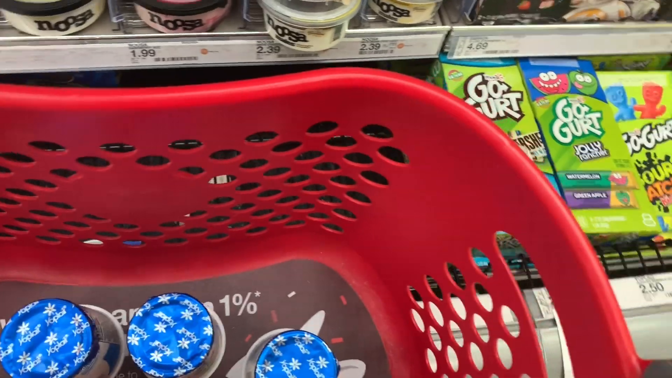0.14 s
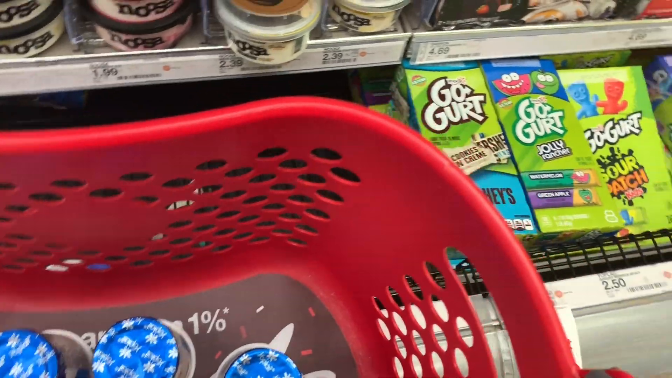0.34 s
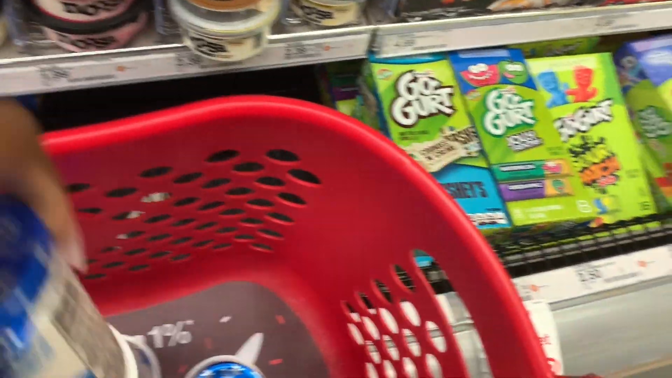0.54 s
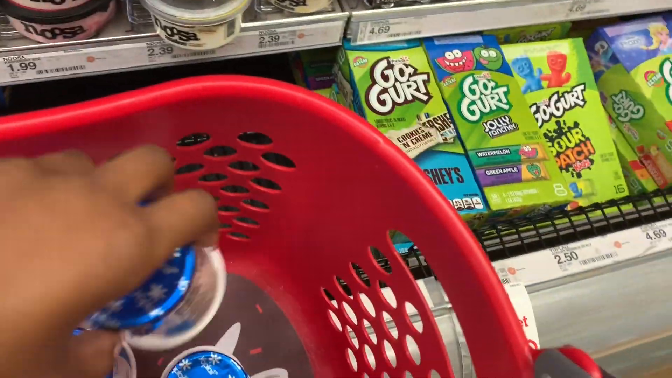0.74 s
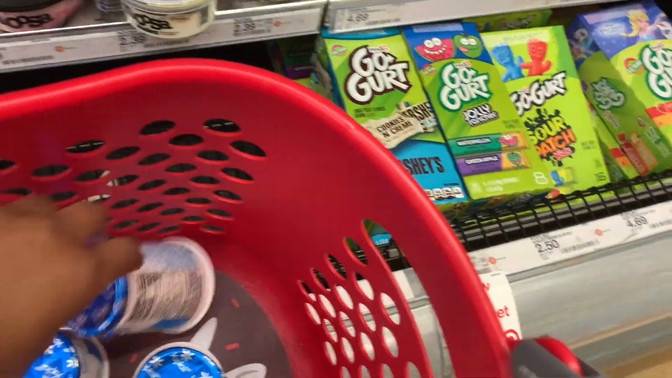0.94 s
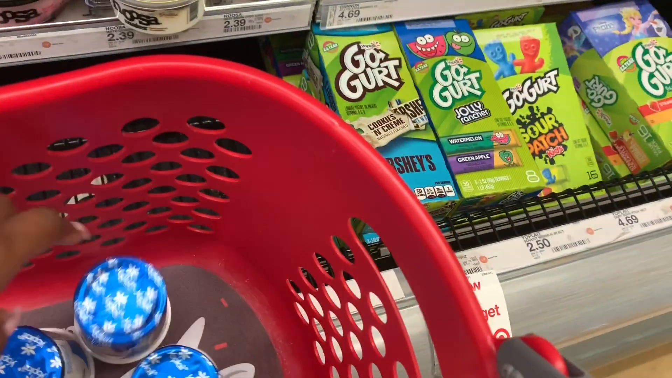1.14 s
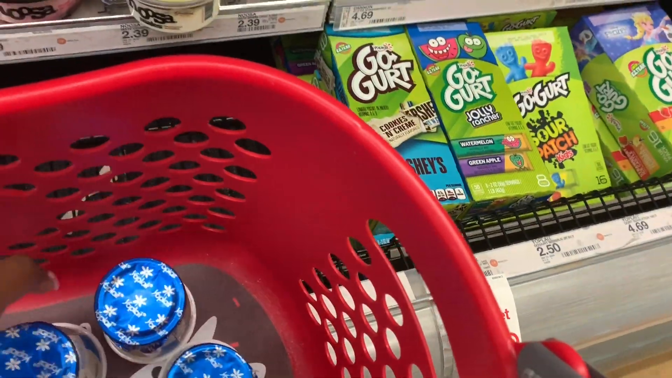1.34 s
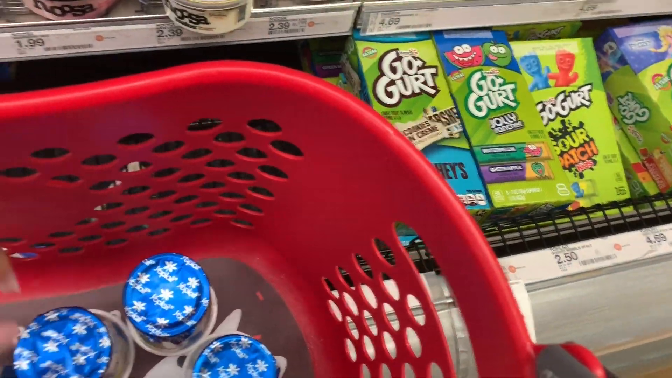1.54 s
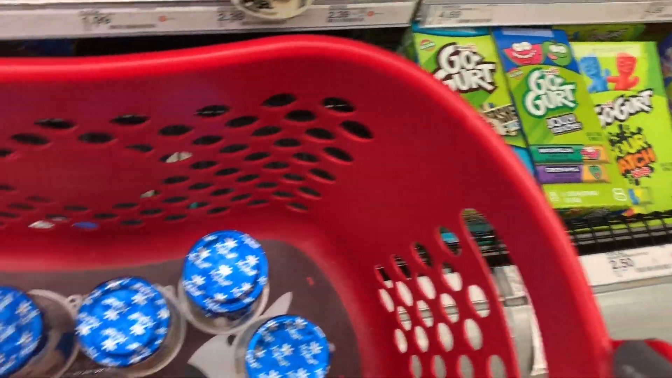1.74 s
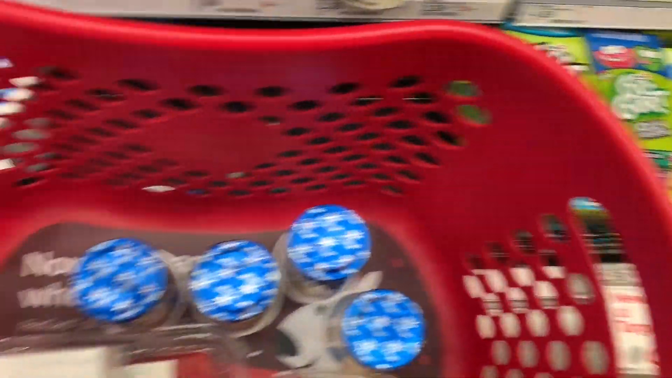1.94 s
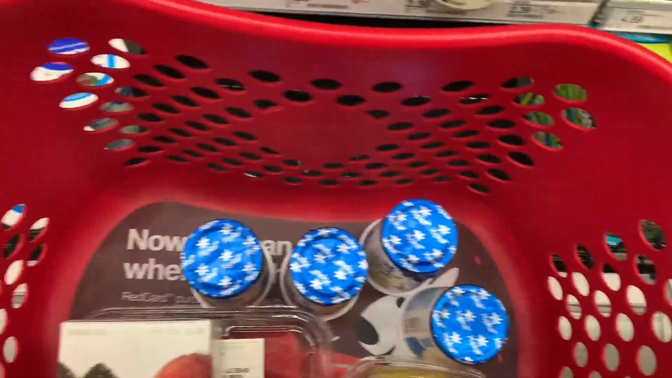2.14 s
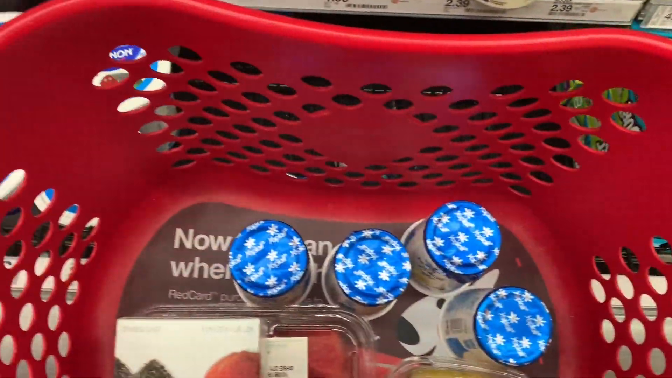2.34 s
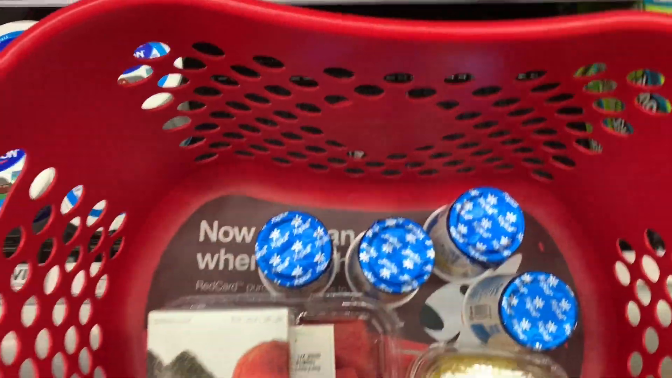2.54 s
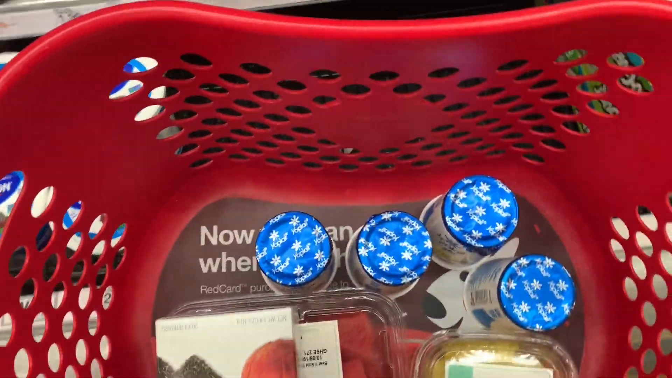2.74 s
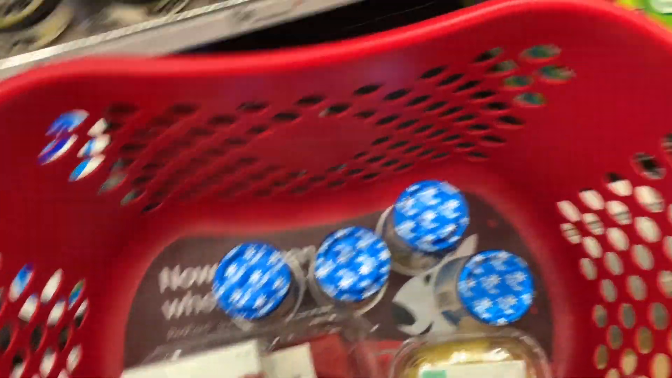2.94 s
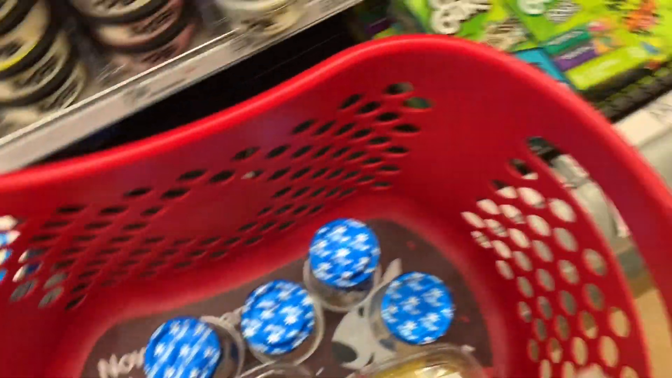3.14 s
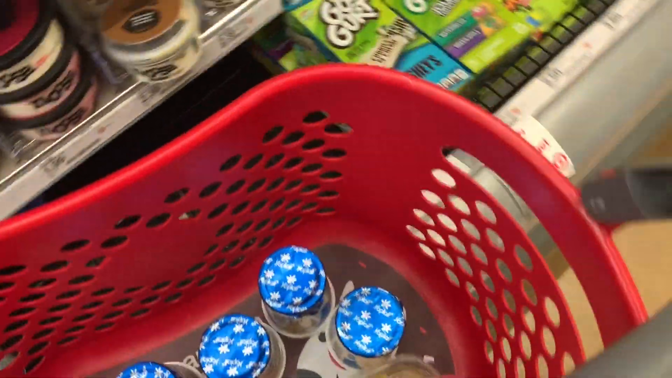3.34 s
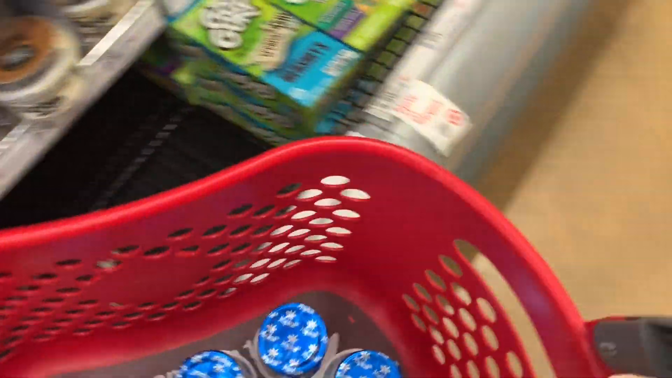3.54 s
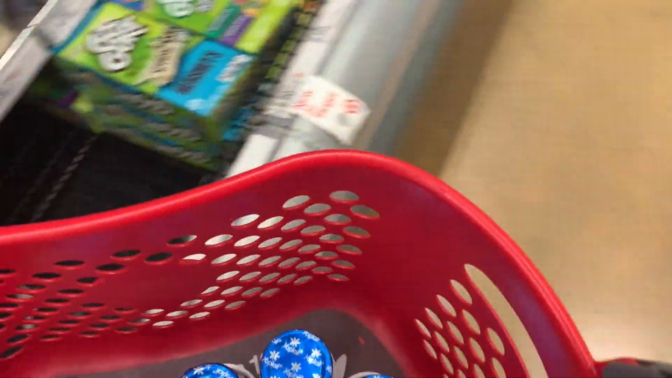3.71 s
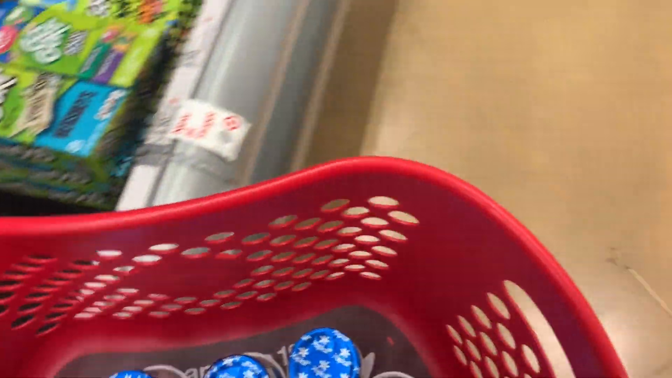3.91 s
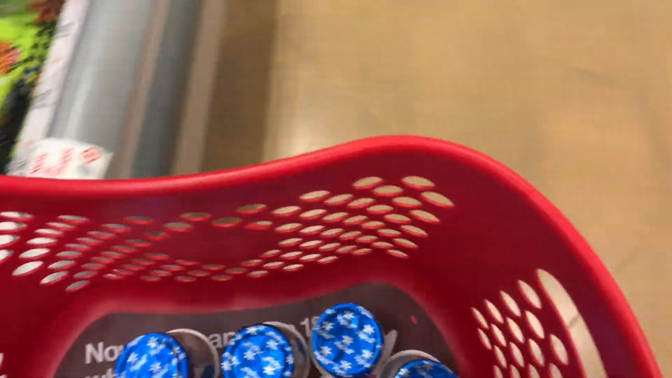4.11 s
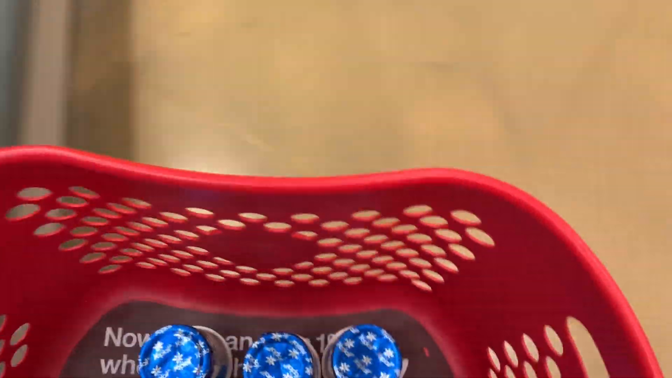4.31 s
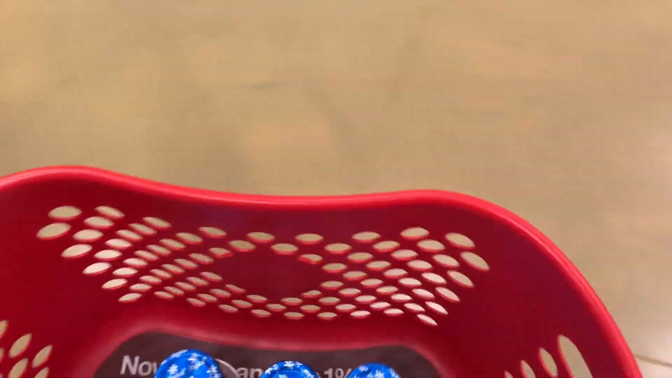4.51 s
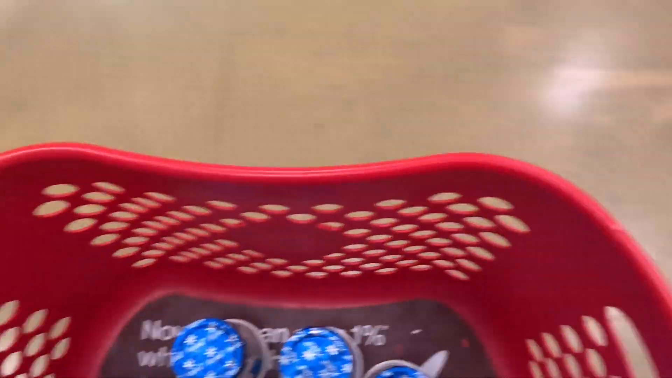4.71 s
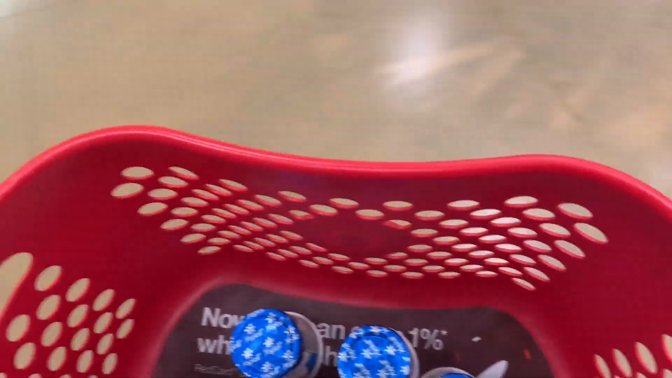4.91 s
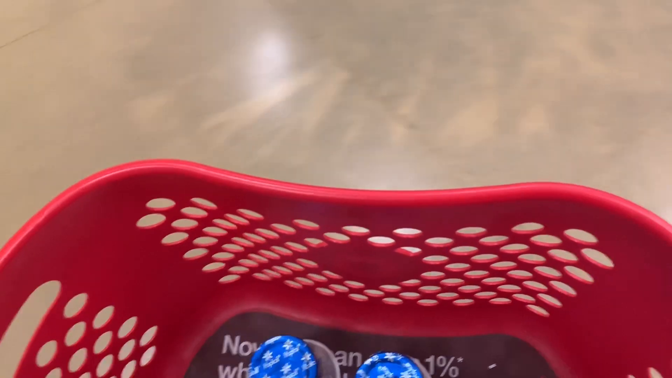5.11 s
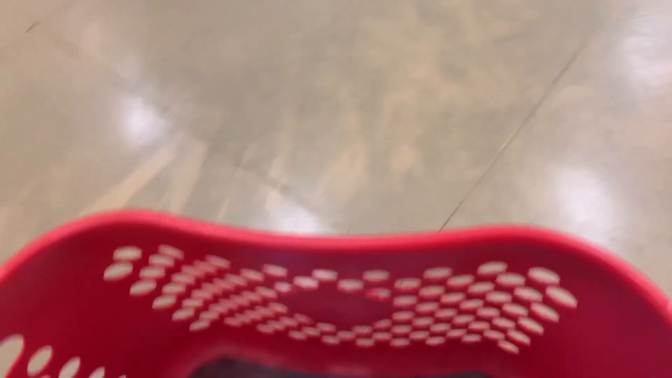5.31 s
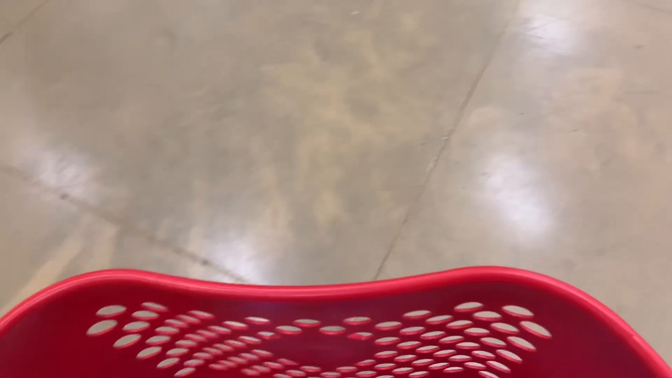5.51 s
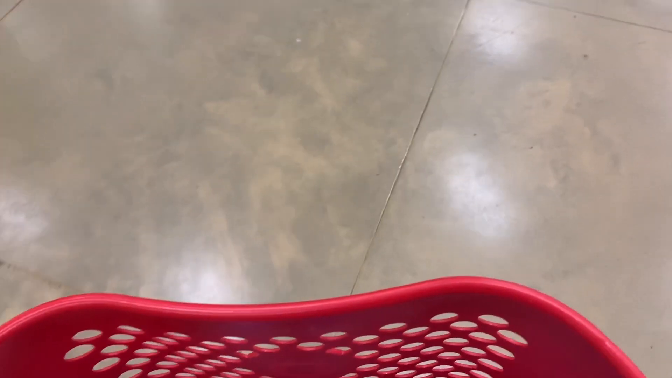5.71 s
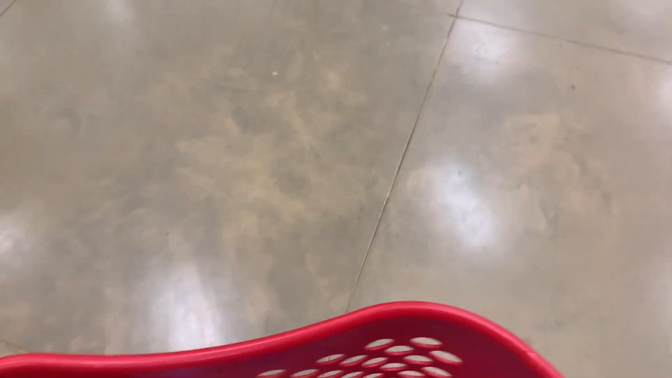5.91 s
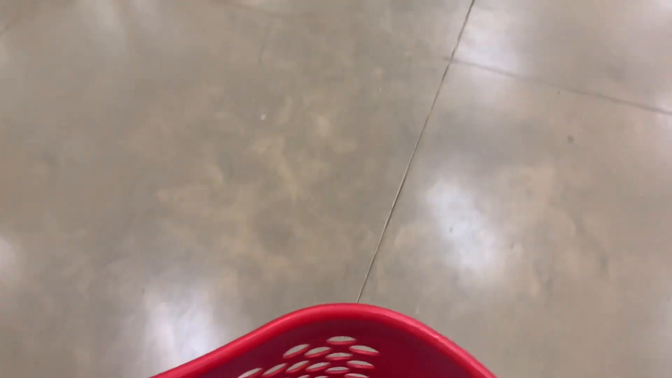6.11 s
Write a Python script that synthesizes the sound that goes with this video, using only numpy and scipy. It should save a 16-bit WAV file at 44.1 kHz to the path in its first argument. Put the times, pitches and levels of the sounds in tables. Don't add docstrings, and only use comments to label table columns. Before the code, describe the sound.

Beside open store refrigerators, a low unsteady hum and fan rumble runs throughout. Close to a hand-held phone, fingers rustle, foil ticks, and a plastic cup lands in a plastic basket with two hard clacks around one second. Later the cups jostle in a brief rattle as the basket swings. The hum weakens as the shopper walks away, and a tiny wheel squeak comes near the end.

```python
import sys
import numpy as np
from scipy import signal
from scipy.fft import rfft, irfft, next_fast_len
from scipy.io import wavfile
from scipy.ndimage import uniform_filter1d, map_coordinates

SR = 44100
rng = np.random.default_rng(int(sys.argv[2]) if len(sys.argv) > 2 else 0)


def how_loud(loudness_db):
    steps = np.asarray(loudness_db, float) / 20
    return 10 ** steps


def unload_wav(signal):
    wavfile.write(
        sys.argv[1],
        SR,
        np.round(np.clip(np.atleast_2d(signal).T, -1, 1) * 32767).astype(np.int16),
    )


N = 271646

# time [s], distance from the row [m].
WALK = [
    (0, 0.93),
    (1.1, 0.92),
    (3.6, 0.96),
    (4.3, 1.235),
    (4.8, 1.65),
    (5.25, 2.1),
    (5.7, 2.12),
    (6.16, 1.92),
]
# pitch [Hz], phase drift [rad].
HUM_TONES = [
    (59.2, 1.2),
    (139.6, 0.48),
    (279, 1.4),
]
# time [s], level [dB].
MAINS_LEVEL = [(0, -44), (.9, -46), (1.0, -36.5), (2.3, -37), (3.5, -30.5), (4.6, -36.5), (5.3, -39.5),
               (6.16, -40)]
# start [s], length [s], level [dB].
CRESTS = [(-.02, 0.2, -28.5), (.46, 0.35, -27.5), (.8, .64, -24.5), (1.56, 0.93, -26), (2.82, 0.91, -22.5),
          (3.95, 0.425, -28.5), (4.45, 0.376, -33), (4.85, 0.32, -36), (5.18, 0.41, -25.5),
          (5.58, 0.485, -28)]
# centre [Hz], width [Hz], level [dB].
DUCT = [(191.8, 14.7, -7), (209.7, 9.2, -9)]
# start [s], length [s], level over the steady throb [dB].
SURGES = [(.02, .36, 3.5), (.5, 0.072, 10.5), (.66, 0.38, 5.5), (1.28, 0.29, 5.5), (1.79, .13, 12),
          (2.0, 0.075, 2), (2.38, 0.13, 2.5), (3.2, 0.12, 8), (3.52, 0.14, -16), (4.2, 0.058, 3),
          (4.66, 0.15, 3), (5.2, 0.11, 7)]
# frequency [Hz], density [dB per Hz].
FAN_RUMBLE = [(70, -18), (130, -4.5), (170, 4.5), (230, 3), (300, -8.5), (400, -8.5), (470, -10.5),
              (550, -11.5), (660, -14), (800, -12), (1050, -25.5), (1600, -52)]
# frequency [Hz], density [dB per Hz].
HALL_DEEP = [(22, -39), (45, -3), (70, -3), (100, 1.5), (120, 5), (170, -12), (260, -48)]
# frequency [Hz], density [dB per Hz].
CABINET_BOOM = [(190, -14), (250, 1.5), (330, 2), (420, -12.5), (520, -45.5)]
# frequency [Hz], density [dB per Hz].
AIR_CURTAIN = [(700, -26), (1100, 2.5), (1400, 2), (2100, 0), (2600, -3), (2900, -11), (4200, -12),
               (4800, -22.5), (6000, -78)]
# frequency [Hz], density [dB per Hz].
FAR_HISS = [(3500, -16), (5000, -24), (7600, -17), (9500, 7), (10900, -5), (12500, -6), (14400, -1),
            (15400, -1), (16000, -12), (16300, -50), (17000, -70)]
# frequency [Hz], left-right likeness [-1 to 1].
ROOM_ALIKE = [(60, 0.92), (130, 0.95), (290, 0.89), (640, 0.32), (1410, -0.17), (3100, 0.11), (6820, -0.29),
              (9500, 0.92), (12000, 0.94)]
# frequency [Hz], left minus right [dB].
FRIDGE_TILT = [(60, -0.5), (110, -3.5), (200, 0), (380, -2), (700, 1), (1290, 0), (2380, -0.5), (4400, 1.5),
               (8120, -4.5), (15000, 2)]

# start [s], length [s], rise [share 0-1], level [dB].
BRUSHES = [(0, 0.018, 0.3, -52.5), (.214, 0.22, 0, -50), (0.346, 0.041, .9, -47), (0.377, .12, .5, -54),
           (0.562, 0.14, 0.38, -53), (0.702, 0.21, 0.03, -50), (0.849, 0.044, .6, -43),
           (0.887, 0.057, 0.5, -41), (0.9562, .008, 0.1, -33), (0.965, 0.028, 0.2, -30),
           (0.99, 0.096, 0.28, -41), (1.084, .018, 0.3, -40), (1.103, .027, 0, -36),
           (1.119, 0.012, 0.5, -35), (1.143, .036, 0.5, -34), (1.377, 0.12, 0.25, -56),
           (1.872, 0.096, 0.5, -59), (2.418, 0.1, 0.3, -49.5), (2.727, 0.19, 0.55, -61),
           (3.077, .08, .4, -61), (3.282, 0.21, 0.7, -57), (3.416, 0.037, 0.3, -41.5),
           (3.432, 0.13, 0.33, -48), (3.52, 0.089, 0.1, -45), (3.61, 0.014, .3, -46),
           (4.443, 0.4, 0.33, -56), (4.672, 0.26, .45, -64), (5.273, .06, .5, -60), (5.632, .19, 0.62, -54),
           (5.915, 0.092, 0.4, -63)]
# frequency [Hz], density [dB per Hz].
BRUSH_SPECTRUM = [(2500, -8), (5000, -4.5), (7500, 1), (10000, 3.5), (13500, 2.5), (16000, -5),
                  (17000, -59)]
# start [s], length [s], resonance [Hz], level [dB].
SCRAPES = [(.843, 0.042, 13100, -33), (.884, 0.045, 13400, -35), (.908, 0.022, 7500, -48),
           (.847, 0.058, 10000, -37.5), (.852, 0.043, 7460, -47), (.99, 0.058, 4000, -47),
           (1.1255, 0.006, 6100, -24), (1.124, .008, 13500, -33), (1.125, 0.06, 980, -35),
           (2.725, 0.19, 13500, -56), (3.526, 0.032, 1910, -47), (3.619, 0.012, 5640, -32),
           (3.621, 0.013, 3900, -31.5), (4.199, 0.0045, 6140, -34), (4.2045, 0.0045, 5900, -33),
           (4.209, 0.006, 12900, -33), (4.205, 0.042, 10800, -58), (5.69, 0.05, 2000, -58),
           (5.67, 0.14, 4900, -62.5)]
# start [s], length [s], resonance [Hz], level [dB].
SKIDS = [(.885, 0.049, 3700, -42), (.886, 0.052, 2500, -47), (.916, 0.013, 6400, -48),
         (3.427, .01, 13400, -39), (.9565, 0.058, 2380, -33.5), (.959, 0.056, 4200, -36),
         (1.083, .023, 13000, -29.5), (1.105, .027, 13100, -32), (1.124, 0.053, 2550, -36.5),
         (1.122, 0.088, 4200, -40.5), (1.19, 0.056, 2880, -51), (1.624, 0.061, 4570, -55),
         (3.418, 0.055, 2150, -37), (3.533, .012, 3950, -38), (3.626, .016, 4050, -38),
         (3.623, .008, 6300, -36), (3.62, 0.023, 2100, -38.5), (4.199, 0.014, 13100, -30.5),
         (4.215, 0.047, 13300, -45)]
# frequency [Hz], left-right likeness [0 to 1].
RUB_ALIKE = [(3000, 0.35), (6500, 0.5), (9000, 0.9), (13000, 0.95)]

# start [s], foil level [dB].
FAINT_TICKS = [(0.223, -43), (0.378, -27), (0.4014, -44), (0.7218, -52), (0.3145, -50), (0.4165, -48),
               (4.975, -47), (1.1934, -43), (1.2084, -39), (1.222, -34), (1.2584, -42), (2.4199, -43),
               (2.4488, -38), (3.28, -39), (3.3378, -40), (3.963, -44), (4.466, -39), (5.2789, -41),
               (5.294, -39), (5.2999, -37)]
# start [s], foil level [dB], wall ring [Hz],
# wall level [dB], brightness [dB per octave].
SET_DOWN = [(0.3411, -37, 7200, -28.5, -1), (0.3574, -32, 7310, -35, -1), (0.3688, -11, 7360, -28, -1.5),
            (0.9562, -19, 5700, -21, 0), (0.971, -14.5, 7090, -25, -2.5), (0.98, -23, 5830, -25, -11.5),
            (1.008, -32, 4000, -51, 3), (1.02, -29, 3500, -38, 0), (1.0144, -29, 3910, -31, -1),
            (1.034, -32, 3870, -43, -6.5), (1.051, -28, 7560, -47, 3), (1.1174, -3.5, 5000, -37, 0.7),
            (1.1245, -19, 3800, -26, 1), (1.128, -22, 6100, -23, 0), (1.142, -9, 5000, -26, 0),
            (1.152, -17.5, 2780, -21.5, -3), (1.16, -22, 2760, -30, -6), (1.168, -22.5, 3980, -30, -4),
            (1.178, -21, 6020, -44, -4), (1.1997, -20, 4200, -33.5, -1.5), (1.2503, -26.5, 4260, -38, -1)]
# start [s], foil level [dB], wall ring [Hz],
# wall level [dB], brightness [dB per octave].
JOSTLE = [(3.421, -34, 2890, -28, 6), (3.425, -23, 2800, -39, -7), (3.432, -17, 3450, -30, -5),
          (3.437, -29, 5000, -40, -6), (3.4864, -40, 2820, -41, 1), (3.5197, -33, 5500, -40, -2),
          (3.5293, -23, 2600, -29, -6.5), (3.5325, -19.5, 3540, -22, -4), (3.5357, -25, 5200, -26, -7),
          (3.546, -25, 4170, -45, -4), (3.5554, -31, 4090, -45, -3), (3.567, -27, 3560, -48, -4.5),
          (3.577, -21.5, 4270, -32, -3), (3.586, -40, 4200, -42, 0), (3.622, -19, 3570, -37, -3.5),
          (3.626, -26, 6000, -29, 1), (3.6307, -21, 4130, -29, -5), (3.658, -35, 4200, -42, 0),
          (3.667, -30.5, 3590, -43, -4.5), (4.2, -30, 6200, -48, 2), (4.511, -29, 4380, -40.5, 1),
          (4.611, -32.5, 4470, -42, -2), (5.184, -39, 5000, -46.5, -3)]
# start [s], cup peak [dB], cup ring [Hz],
# basket level [dB], hardness [0-1].
KNOCKS = [(0.955, -5, 1076, -7, 0.76), (0.964, -10.5, 607, -15, 0.4), (1.1239, -13.5, 1150, -17, 0.7),
          (1.128, -13.5, 605, -32, 0.9), (1.131, -24, 764, -16, 1), (1.138, -25, 756, -35, 0.5),
          (1.145, -28, 820, -39, 0.8), (1.1514, -10.5, 783, -18.5, 0.53), (1.157, -17, 1260, -18, 1),
          (1.165, -24, 760, -25, 1), (1.177, -29, 686, -21, 0.2), (1.2, -27.5, 850, -43, 1),
          (3.418, -6.5, 747, -28, 0.85), (3.428, -23, 890, -38, 0.6), (3.435, -16, 676, -32, 0.25),
          (3.46, -28, 910, -40, 0.4), (3.468, -17.5, 760, -36, 0.55), (3.476, -23, 790, -23, 0.9),
          (3.531, -24, 630, -41, 0.8), (3.625, -25.5, 620, -33, 1), (4.2, -24, 1870, -60, 0.9),
          (4.2055, -17.5, 1880, -60, 0.86), (5.707, -33, 1890, -60, 0.53)]
# centre [Hz], width [Hz], level [dB].
FOIL = [(6090, 990, -6.5), (8100, 710, 3), (10000, 1180, 7), (13400, 2500, 3), (15800, 1140, -3)]
# centre [Hz], width [Hz], level [dB].
BASKET = [(70.4, 19, 3.5), (376, 57, 3), (578, 66, -5), (1656, 21, -7), (2370, 270, -6)]

# time [s], pitch [Hz], level [dB].
SQUEAK = [
    (5.62, 493.5, -42),
    (5.632, 494, -50),
    (5.67, 561, -45),
    (5.778, 516, -41),
    (5.92, 497, -48),
]
# frequency [Hz], 60 dB decay [s].
AISLE_DECAY = [(300, 0.21), (2000, 0.2), (10000, 0.094)]
# frequency [Hz], gain [dB].
CASE_COLOUR = [(5000, 0.5), (8000, -2.5), (10000, -3), (12600, -9), (14400, -7), (15900, -14), (16200, -30),
               (16700, -50)]

HZ = np.fft.rfftfreq(4096, 1 / SR)
FANS_DB, CABINET_DB, CURTAIN_DB, OVERTONE_DB, DUCT_DB = -25.5, -31, -46, -36, -31
HALL_DB, FAR_HISS_DB = -32.5, -72
ROW_LOSS_DB, CABINET_LOSS_DB, CURTAIN_LOSS_DB, DUCT_LOSS_DB = 23, 35, 18.5, 11.5
SCRAPE_RISE, SKID_RISE = 0.4, 0.041
FAINT_WALL_HZ, FAINT_WALL_DB, FAINT_BRIGHT_DB = 3200, -12, -3.5
TICK_T60_S = 0.0075
LIGHT_T60_S, DEADEN = 0.036, 2.1
LEFT_LATE_S, LATE_FROM_HZ, LATE_FULL_HZ = 0.000298, 5000, 8000


def unit(x):
    return x / np.sqrt(np.mean(x ** 2) + 1e-20)


def peak(x):
    return x / np.abs(x).max()


def along(points, hz):
    f, v = np.transpose(points)
    return np.interp(np.log(hz + 1), np.log(f + 1), v)


def curves(rows, **ends):
    s, *cols = np.transpose(rows)
    return [np.interp(np.arange(N) / SR, s, c, **ends) for c in cols]


def wobble(rate):
    knots = rng.standard_normal(int(N * rate / SR) + 4)
    return map_coordinates(knots, [np.arange(N) * rate / SR])


def plateaus(rows, edge_s):
    t = np.arange(N) / SR
    total = np.zeros(N)
    for s, length, db in rows:
        inside = np.clip(np.minimum(t - s, s + length - t) / edge_s, 0, 1)
        total += how_loud(db) * np.sin(np.pi / 2 * inside) ** 2
    return total


def filtered(x, response):
    m = next_fast_len(N + 8192)
    return irfft(rfft(x, m) * response(np.fft.rfftfreq(m, 1 / SR)), m)[..., :N]


def modes(table, f):
    return sum((-1) ** k * how_loud(db) * 1j * f * w / (c * c - f * f + 1j * f * w)
               for k, (c, w, db) in enumerate(table))


def ports(length, alike):
    a, b = rng.standard_normal((2, length))
    return np.array([a, alike * a + np.sqrt(abs(1 - alike ** 2)) * b])


def add(out, s, burst, lag):
    for side, part, late in zip(out, burst, (0, lag)):
        side[round(s * SR) + late:][:len(part)] += part


def rush(spectrum, patchy_db, alike=ROOM_ALIKE):
    z = signal.stft(rng.standard_normal((2, N + 512)), nperseg=512)[2]
    field = uniform_filter1d(rng.standard_normal(z.shape[1:]), size=6, axis=0)
    field = uniform_filter1d(field, size=14, axis=1)
    pair = signal.istft(z * how_loud(patchy_db * unit(field)), nperseg=512)[1][:, :N]

    def spread(hz):
        turn = np.arccos(np.clip(along(alike, hz), -1, 1)) / 2
        return how_loud(along(spectrum, hz)) * np.array([np.cos(turn), np.sin(turn)])

    mid, side = filtered(pair, spread)
    return unit(np.array([mid + side, mid - side]))


def fridges():
    decades = np.log10(curves(WALK)[0])
    air = how_loud(FANS_DB - ROW_LOSS_DB * decades + 1.85 * wobble(9)) * rush(FAN_RUMBLE, patchy_db=0.9)
    air += how_loud(HALL_DB + 1.9 * wobble(4.1)) * rush(HALL_DEEP, patchy_db=0.9)
    air += how_loud(CABINET_DB - CABINET_LOSS_DB * decades) * rush(CABINET_BOOM, patchy_db=2.5)
    curtain_gain = how_loud(CURTAIN_DB - CURTAIN_LOSS_DB * decades + 0.59 * wobble(3.17))
    air += curtain_gain * rush(AIR_CURTAIN, patchy_db=1.75)
    air += how_loud(FAR_HISS_DB) * rush(FAR_HISS, patchy_db=0.4)

    t = np.arange(N) / SR
    mains, pump, overtone = [np.sqrt(2) * np.sin(2 * np.pi * hz * t + drift * wobble(8))
                             for hz, drift in HUM_TONES]
    buzz = mains + 0.66 * (mains ** 2 - 1)
    tones = how_loud(curves(MAINS_LEVEL)[0] + 1.5 * wobble(7.8)) * buzz
    tones += plateaus(CRESTS, edge_s=0.11) * how_loud(0.66 * wobble(16)) * pump
    tones += how_loud(OVERTONE_DB - CABINET_LOSS_DB * decades + 2.5 * wobble(11)) * overtone

    duct = unit(filtered(rng.standard_normal(N), lambda f: modes(DUCT, f) ** 2))
    duct /= np.sqrt(np.abs(uniform_filter1d(duct ** 2, size=6000))) + 0.5
    throb = how_loud(DUCT_DB - DUCT_LOSS_DB * decades) * (0.9 + 0.71 * plateaus(SURGES, edge_s=0.061))
    row = air + tones + throb * unit(duct)
    return filtered(row, lambda f: how_loud(np.outer([.5, -.5], along(FRIDGE_TILT, f))))


def rustle():
    out, f = np.zeros((2, N + SR)), np.fft.rfftfreq(16384, 1 / SR)
    alike = along(RUB_ALIKE, f)
    strokes = [(*row, how_loud(along(BRUSH_SPECTRUM, f))) for row in BRUSHES]
    for rows, rise in ((SCRAPES, SCRAPE_RISE), (SKIDS, SKID_RISE)):
        for s, length, hz, db in rows:
            strokes.append((s, length, rise, db, modes([(hz, 0.24 * hz, 0)], f) ** 2))
    for s, length, rise, db, colour in strokes:
        u, rise = np.arange(16384) / SR / length, np.clip(rise, .06, .9)
        fall = np.clip((1.3 - u) / (1.3 - rise), 0, 1) ** 2.14
        swell = np.clip(u / rise, 0, 1) ** 0.67 * fall
        a, b = rfft(rng.standard_normal((2, 16384)))
        pair = np.array([a, alike * a + np.sqrt(1 - alike ** 2) * b])
        add(out, s, 2.1 * swell * how_loud(db) * unit(irfft(pair * colour)), lag=0)
    grain = unit(how_loud(2.6 * wobble(520) + 1.2 * wobble(90)))
    return out[:, :N] * grain


def ticks(out):
    t = np.arange(4096) / SR
    faint = [(s, db, FAINT_WALL_HZ, db + FAINT_WALL_DB, FAINT_BRIGHT_DB) for s, db in FAINT_TICKS]
    shape = how_loud(-60 * t / TICK_T60_S) * (1 - np.exp(-10 * t / TICK_T60_S)) ** 2
    for s, db, hz, wall_db, bright_db in SET_DOWN + JOSTLE + faint:
        bright = how_loud(4.24 * bright_db * np.log2(HZ / 10000 + 0.013))
        foil = irfft(rfft(ports(len(t), 0.94) * shape) * modes(FOIL, HZ) * bright)
        wall_modes = [(hz, 0.2 * hz, 0), (1.52 * hz, .5 * hz, -7), (.5 * hz, 1.5 * hz, -12)]
        wall = irfft(rfft(ports(len(t), 0.27) * shape) * modes(wall_modes, HZ))
        add(out, s, how_loud(db + 2.0) * peak(foil) + how_loud(wall_db + 7.5) * peak(wall), lag=0)


def knocks(out):
    t = np.arange(4096) / SR
    for s, db, hz, basket_db, hard in KNOCKS:
        contact = 0.00081 * how_loud(-14 * hard)
        grit = 0.01 * ports(len(t), 0.27) * how_loud(-60 * t / 0.0045)
        push = rfft(np.exp(-((t - .0008) / contact) ** 2) + grit)
        width = 2.15 * (1 + DEADEN * 2 * how_loud(db)) / LIGHT_T60_S * max(hz / 1100, 1) ** 1.8
        cup_modes = [(hz, width, 0), (1.388 * hz, 0.78 * width, -3),
                     (1.77 * hz, 2.0 * width, -7), (2.7 * hz, 3 * width, -10)]
        small_body = (1j * HZ / (1j * HZ + 0.31 * hz)) ** 4
        cup = irfft(push * modes(cup_modes, HZ) * small_body)
        floor = irfft(push * modes(BASKET, HZ) * np.exp(-2j * np.pi * HZ * 0.00177))
        blow = how_loud(db + 1.5) * peak(cup) + how_loud(basket_db + 4.5) * peak(floor)
        add(out, s, how_loud([[-0.3], [0.3]]) * blow, lag=6)


def cups():
    out = np.zeros((2, N + SR))
    ticks(out)
    knocks(out)
    return out[:, :N]


def aisle(x):
    hz, t, z = signal.stft(rng.standard_normal((2, SR // 3)), SR, nperseg=256)
    decay = how_loud(-60 * t / along(AISLE_DECAY, hz)[:, None])
    tail = signal.istft(z * decay, SR, nperseg=256)[1]
    late = np.pad(x, ((0, 0), (150, 0)))
    return signal.fftconvolve(late, tail / np.linalg.norm(tail[0]), axes=1)[:, :N]


def wheel():
    hz = curves(SQUEAK)[0]
    db = curves(SQUEAK, left=-120, right=-120)[1]
    phase = 2 * np.pi * np.cumsum(hz) / SR + 2.2 * wobble(45)
    return uniform_filter1d(how_loud(db + 6.0), size=900) * np.sin([phase, phase + 1.5])


def case(hz):
    late = LEFT_LATE_S * np.clip((hz - LATE_FROM_HZ) / (LATE_FULL_HZ - LATE_FROM_HZ), 0, 1)
    return how_loud(along(CASE_COLOUR, hz)) * np.exp(-2j * np.pi * np.outer([1, 0], hz * late))


def gate(x, floor_db):
    hz, _, z = signal.stft(np.array([x[0] + x[1], x[0] - x[1]]) / 2, SR, nperseg=2048)
    edges = np.arange(9650, 16600, 345)
    for lo, hi in zip(edges, edges[1:]):
        band = (hz >= lo) & (hz < hi)
        level = np.sqrt(np.mean(np.abs(z[:, band]) ** 2, axis=1, keepdims=True))
        z[:, band] *= level > how_loud(floor_db)
    mid, side = signal.istft(z * (hz < edges[-1])[:, None], SR, nperseg=2048)[1][:, :N]
    return np.array([mid + side, mid - side])


def scene():
    hum = fridges() + wheel()
    near = cups()
    return near + how_loud(-10.5) * aisle(near) + rustle() + hum


def low_pass(x):
    return signal.sosfilt(signal.butter(12, 16510, fs=SR, output="sos"), x)


def record(dry):
    coloured = filtered(dry, case)
    rounded = coloured / (1 + np.abs(coloured / .97) ** 6) ** (1 / 6)
    return low_pass(gate(rounded, floor_db=-100.0))


dry = scene()
out = record(dry)
unload_wav(out)
```